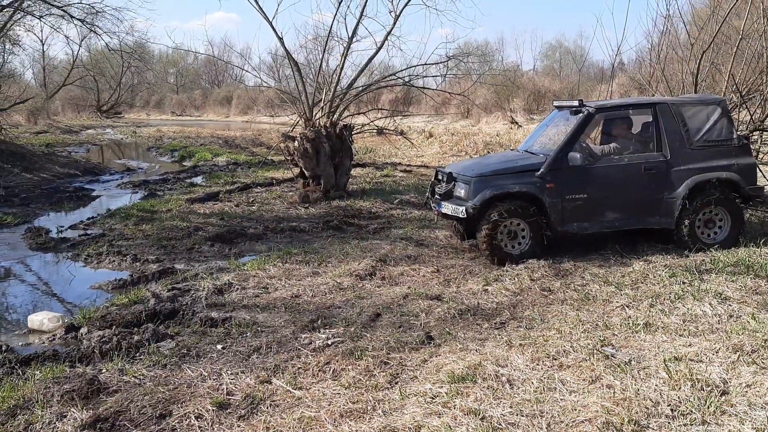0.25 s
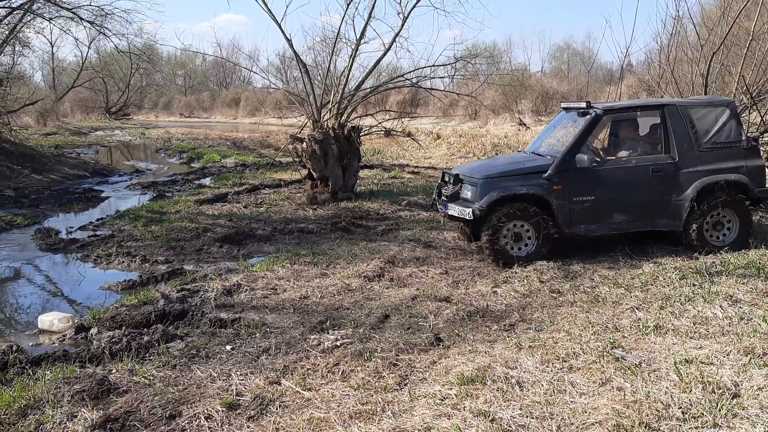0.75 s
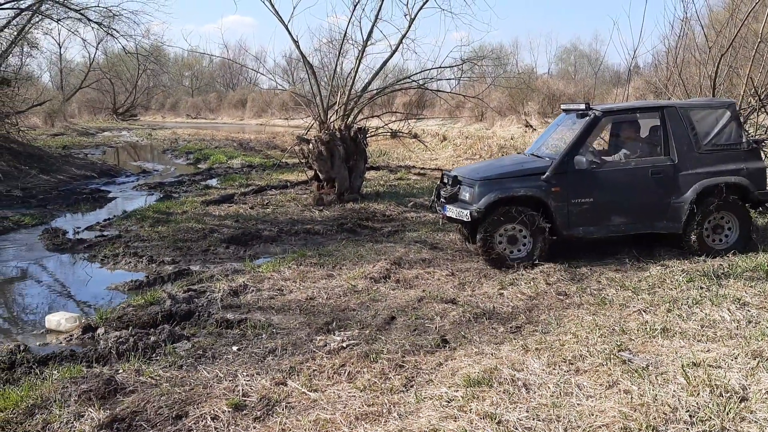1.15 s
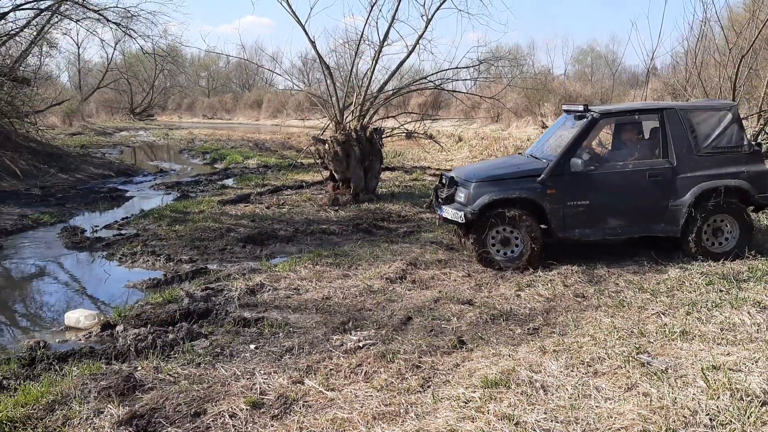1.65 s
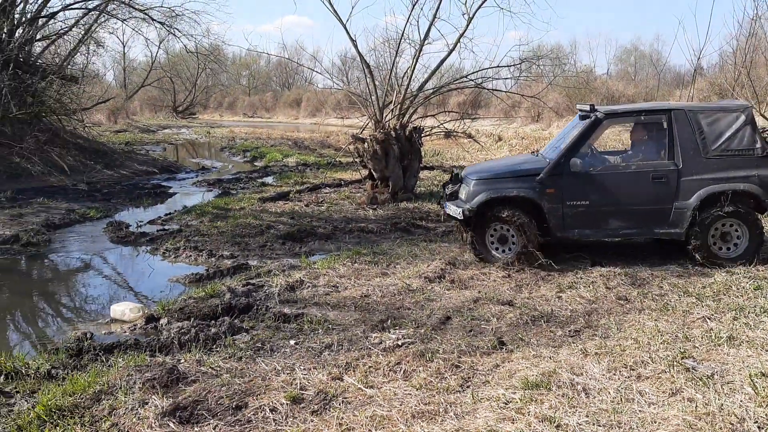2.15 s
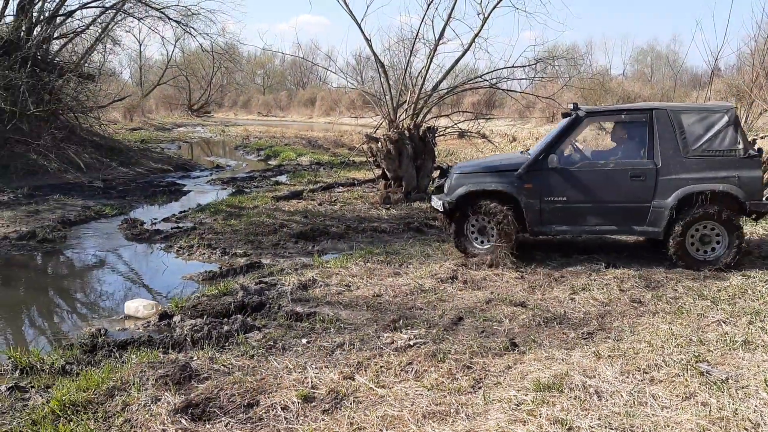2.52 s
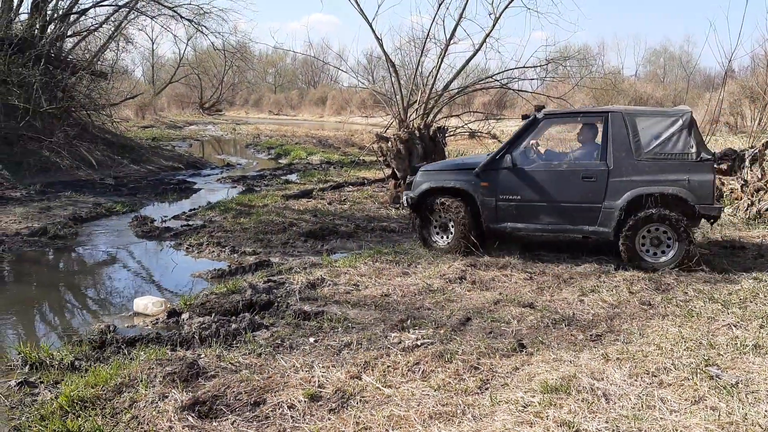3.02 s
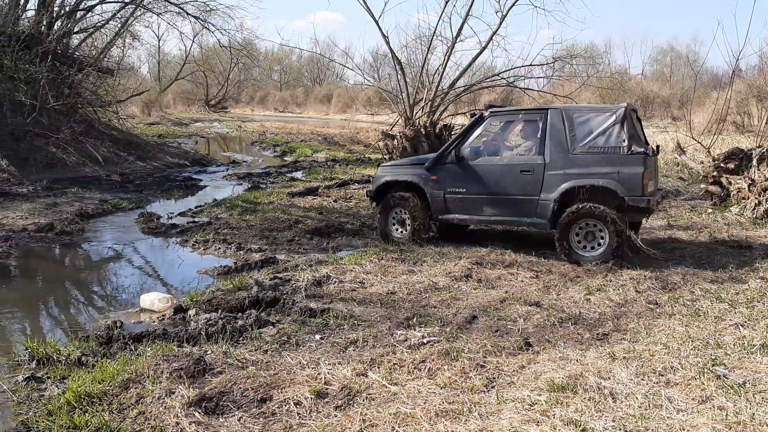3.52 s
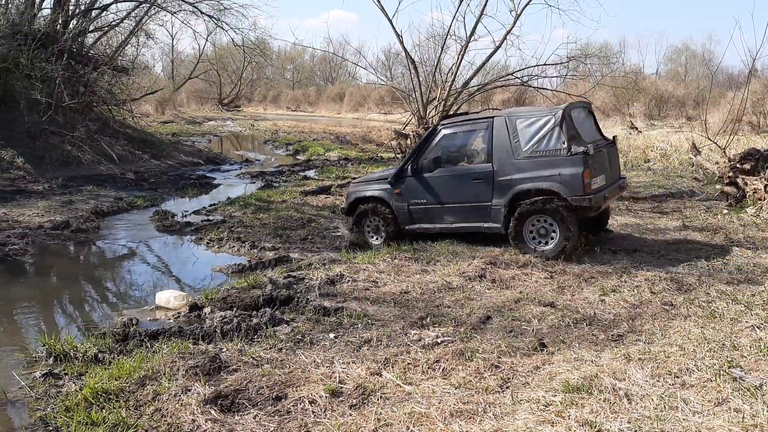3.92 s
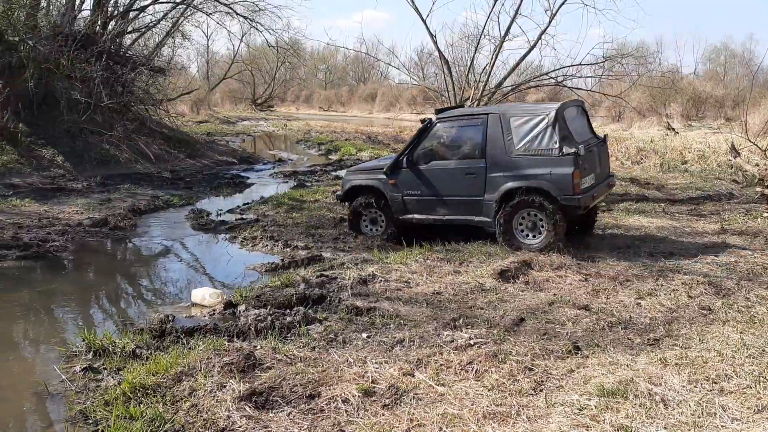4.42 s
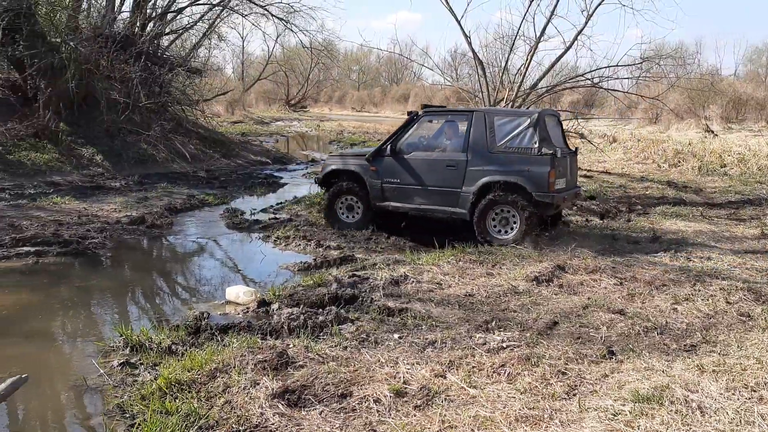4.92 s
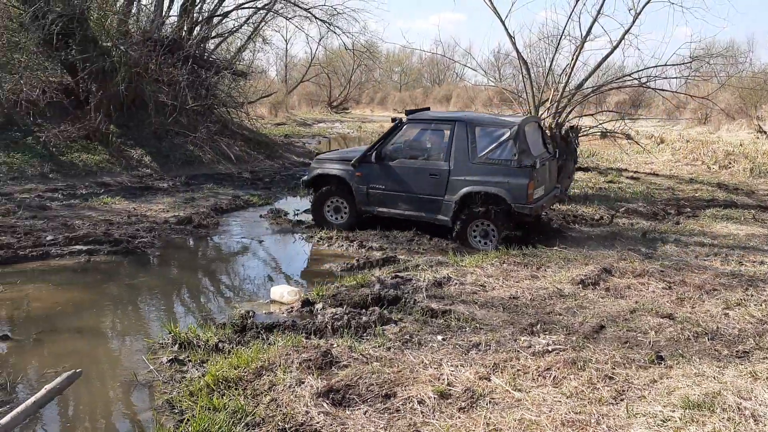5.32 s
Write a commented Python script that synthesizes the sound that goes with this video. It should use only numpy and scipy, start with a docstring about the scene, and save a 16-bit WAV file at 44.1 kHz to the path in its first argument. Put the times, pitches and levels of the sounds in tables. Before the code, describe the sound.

A small off-road car growls across a muddy meadow in short throttle dabs, tyres crunching dry grass, then revs up hard towards a stream.

```python
"""A small bird chirps far off while a small four-wheel-drive crawls over a muddy meadow in dabs of throttle.
Each dab makes pulse orders of the exhaust boom and turbulent gas rasp; engine bay resonances whir and sing.
The tyres crush dry grass in clumps of tiny fractures; stalks snap as short noise bursts throughout.
A tyre slips once in gliding bands of noise, the springs squeak in short tones, and the tail swings round.
Wet earth joins the grass, and at last the engine revs up towards a stream."""
import sys
import numpy as np
from scipy import signal
from scipy.fft import rfft, irfft, next_fast_len
from scipy.io import wavfile
from scipy.ndimage import uniform_filter1d, map_coordinates

SR = 44100
rng = np.random.default_rng(int(sys.argv[2]) if len(sys.argv) > 2 else 0)


def persist_wave(psi):
    """Save psi, clipped to +-1, as 16-bit WAV."""
    counts = np.round(np.clip(psi, -1, 1) * 32767).astype(np.int16)
    wavfile.write(sys.argv[1], SR, np.atleast_2d(counts).T)


N = 245195

# crank speed at its turning points: (time [s], firing rate [1/s])
FIRING_RATE = [(0.0, 37.01), (0.456, 28.9), (0.696, 46.78), (0.781, 46.66), (1.094, 63.61), (1.278, 57.9),
               (1.55, 68.19), (2.015, 45.35), (2.282, 52.1), (2.569, 43.51), (2.786, 54.46), (3.362, 33.83),
               (3.676, 51.11), (3.903, 57.08), (4.305, 60.91), (4.393, 67.71), (4.562, 70.44),
               (4.967, 89.47), (5.28, 113.64), (5.56, 128.53)]
CRAWL_HZ = 60  # reference firing rate
# presses of the throttle: (start [s], hold [s], load [0-1])
THROTTLE_PRESSES = [(0.401, 0.24, 0.76), (.73, 0.33, 0.73), (1.198, 0.29, 0.7), (1.98, 0.27, 0.51),
                    (2.489, 0.25, 0.56), (3.298, .42, 0.71), (3.6, .69, 0.66), (4.2, 1.4, 0.86)]
PRESS_S, RELEASE_S = 0.15, 0.065  # linear build-up; time constant of the decay once the foot lifts

# exhaust from coasting to full load, before the gains that follow speed: (load [0-1], firing order [dB],
# order 1.5 [dB], order 2 [dB], muffler drone [dB], pulse edges [dB], gas rasp [dB])
EXHAUST_BY_LOAD = [(0, -36, -69, -48, -35.5, -58, -66), (.35, -35, -47, -41, -34, -50, -55.5),
                   (.6, -36, -48, -39, -42.5, -45.5, -48.5), (1, -25, -27, -34, -40.5, -38.5, -41)]
HALF_ORDER_DB = 4  # order 0.5 over order 1.5
# order 3 grunts when the engine lugs: (firing rate [1/s], level over order 1.5 [dB])
THIRD_ORDER = [(40, 1.5), (50, -1.5), (58, -22.5)]
# pipe resonances that each order sweeps through: (frequency [Hz], gain [dB])
BOOM_COLOUR = [(25, -43), (37, -20), (46, -13), (60, 1), (75, 10), (95, 7.5), (118, 0), (160, 9.5),
               (185, 9), (205, 6.5), (250, 3.5)]
PIPE_HZ, PIPE_WIDTH_HZ = 84, 26  # the exhaust pipe's lowest resonance
RING_FROM_HZ, RING_STEP_HZ = 330, 130  # above this pitch a growing phase lag smears each edge

# what muffler and tailpipe pass of the pulse edges: (frequency [Hz], gain [dB])
TAILPIPE = [(130, -9.5), (170, -3.5), (205, -2.5), (240, -0.5), (270, -2), (300, -12), (335, -9),
            (390, -29), (440, -9.5), (490, -8), (540, -3.5), (580, -14), (625, -11), (700, -29), (820, -10),
            (930, -37), (1100, -8), (1400, -24)]
# the pulses sharpen with the revs: (firing rate [1/s], gain [dB])
EDGE_GROWTH = [(45, -5.5), (62, -3.5), (70, 1.5), (83, 6.5), (98, 10), (110, 10), (128, 8)]
EDGE_DB_PER_OCTAVE = -7.5  # slope of the orders above the fourth
EDGE_JITTER, EDGE_SCATTER_DB = 0.0099, 2.08  # scale of random timing [firings] and of random level
# half orders against whole ones, by engine speed: (firing rate [1/s], gain [dB])
LIMP_BY_SPEED = [(41, -14), (50, 1)]
# half orders against whole ones, by pitch: (frequency [Hz], gain [dB])
LIMP_BY_PITCH = [(290, 1.5), (400, -14.5)]
STRONG_CYLINDER_DB = 1.5  # accent of the hardest cylinder, before each part's own weight
# firings that bang out harder, as heard in the edges: (time [s], accent [dB])
BANGS = [(0.585, 12.5), (.924, 3.5), (0.996, 5), (3.575, 4.5), (4.642, 2.5), (4.694, 0.5)]
BANG_S = 0.0089  # standard deviation of the bell-shaped accent

# the rasp grows with the revs: (firing rate [1/s], gain [dB])
RASP_GROWTH = [(30, -14), (55, -0.5), (78, 3), (87, 12), (95, 5.5), (107, 8.5), (128, 11.5)]
# spectrum of the gas heard from the car's side: (frequency [Hz], density [dB per Hz])
GAS_SIDE = [(200, 6), (340, -2.5), (480, -8), (590, -4), (690, 6), (800, -8), (1000, -2.5), (1600, -21),
            (5000, -19), (13000, -20.5)]
# spectrum of the gas heard from behind: (frequency [Hz], density [dB per Hz])
GAS_BEHIND = [(200, 14), (340, 0), (450, 8.5), (550, 5), (680, -5.5), (1050, 2), (1600, -32), (5000, -12.5),
              (13000, -26.5)]
BARK_S, BARK_DB = 0.35, 3.5  # gain per unit rise of load over this time
PUFF_SCATTER_DB = 2.8  # no two puffs are alike
TURN_FROM_S, TURN_TO_S = 3.45, 3.76  # the car swings its tail towards the microphone

# muffler chamber, applied twice: (centre [Hz], width [Hz], gain of one pass [dB])
CHAMBER = [(138, 38, -4), (202.9, 38.6, -1.5), (233, 41, -.5)]
MUFFLER_HZ = 256  # steep upper cutoff of the chamber
# the chamber's ring blurs at low revs: (firing rate [1/s], turbulent share [0-1])
BLUR = [(35, .5), (42, .13), (64, .06)]
# the drone swells with the revs, then sinks as the orders pass the muffler: (firing rate [1/s], gain [dB])
DRONE_GROWTH = [(30, -6.5), (45, -1), (60, -0.5), (92, -5.5), (128, -20)]

# engine bay noise spectrum: (frequency [Hz], gain [dB])
BAY_COLOUR = [(100, 2.5), (370, 0.5), (480, 6), (800, -4), (1250, -1), (1600, 3.5), (1820, -6.5), (2200, 0),
              (3200, -8), (5000, -10), (7000, -13), (16000, -24)]
# engine bay resonances: (centre [Hz], width [Hz], gain [dB])
PANELS = [(624, 64, 1.5), (1131, 32, 3.5), (1394, 54, -13), (2040, 42, 7), (2487, 160, 1.5),
          (2930, 58, 2.5), (3800, 84, -19), (4254, 230, -2)]
# panels that sing for a while: (middle [s], length [s], pitch [Hz], width [Hz], level [dB])
SINGING = [(0.253, 1.9, 1424, 49, -61.5), (.95, 1.4, 2174, 79.6, -57), (1.277, 1.9, 657.5, 59.9, -61),
           (1.85, 1.5, 2163, 89.8, -59.5), (2.5, 0.83, 2197, 148.8, -60.5), (2.68, 1.4, 1370, 110.3, -59),
           (2.767, 0.98, 1104, 50.24, -58), (2.926, 0.53, 2123, 109.5, -56.5),
           (3.47, 0.23, 1414, 109.9, -58), (4.0, 1.6, 1115, 50.05, -64)]
BAY_DB, BAY_LOAD_DB = -50.5, 1  # reference level coasting at the crawl, and gain at load 1
BAY_DB_PER_OCTAVE = 4  # growth with crank speed
WAVER, FLUTTER_DB = 0.0082, 2.3  # random share of a singing panel's pitch, and random level

# how hard the tyres crush the ground: (time [s], tread level [dB])
TREAD = [(0.0, -61.5), (0.32, -78), (0.56, -59), (0.71, -62.5), (1.27, -55), (1.36, -54), (1.76, -57),
         (2.77, -58), (3.02, -60), (3.3, -57.5), (3.7, -53.5), (4.92, -48.5), (5.05, -48), (5.22, -43.5),
         (5.34, -43), (5.56, -41)]
# wet earth spectrum: (frequency [Hz], gain [dB])
EARTH_COLOUR = [(300, 1), (600, 2), (1100, -5.5), (1600, 3), (1850, -4.5), (2200, -3), (3800, -3),
                (5500, -27), (9000, -7.5), (16000, -51)]
# dry grass spectrum: (frequency [Hz], gain [dB])
GRASS_COLOUR = [(1500, -1.5), (3500, 1), (5000, -2.5), (6500, -5.5), (9000, -5), (11300, 1.5),
                (13500, -2.5), (15800, -12)]
GRASS_DB, EARTH_DB = 2.5, 6.5  # over the tread level, earth when fully wet
MUD_FROM_S, MUD_FULL_S = 3.15, 6  # straight ramp of wetness, still rising at the end
STALKS_PER_S, STALK_T60_S, STALK_DB = 14, 0.015, -10.5  # mean rate, decay, level over the tread

# twigs and clods: (time [s], level [dB], centre [Hz], width [octaves], 60 dB decay [s])
SNAPS = [(0.2103, -40, 3280, 0.44, 0.017), (0.306, -37, 9000, 1.1, 0.008), (.527, -48, 12500, .4, .025),
         (.574, -51, 12500, .4, .025), (.621, -47, 12500, .4, .025), (1.846, -42, 10300, 0.35, 0.033),
         (2.0999, -28, 9700, 0.55, 0.01), (2.79, -48.5, 3000, 0.63, 0.73), (3.596, -38.5, 985, 0.31, 0.056),
         (3.615, -52, 950, .45, 0.046), (3.75, -33, 12900, 0.22, 0.0084), (3.829, -38, 1060, 0.41, 0.14),
         (3.865, -38, 750, 0.33, 0.023), (3.905, -39, 10000, 0.76, 0.033), (4.6554, -35, 9800, 0.52, 0.019),
         (4.69, -43, 905, 1, 0.017), (4.842, -37, 1700, 1.06, 0.23), (4.918, -32.5, 2000, 1.4, 0.13),
         (4.975, -32.5, 1030, 0.17, 0.17), (5.003, -33.5, 2180, 1.5, 0.15), (5.309, -32, 3020, 2.36, 0.036),
         (5.406, -24.5, 8100, 1.7, 0.031), (5.479, -28, 11100, 1.09, 0.035)]

# scrape of the slipping tyre: (frequency [Hz], density [dB per Hz])
SKID_COLOUR = [(700, -17), (1200, -1), (2900, -1.5), (3400, -20), (6300, -25), (7600, -8), (9000, -15),
               (14000, -33)]
# resonances of the slip: (start [s], length [s], start pitch [Hz], end pitch [Hz], width [Hz], level [dB])
SKID_GLIDES = [(1.173, 0.06, 6900, 8100, 1100, -53), (1.184, 0.07, 1142, 1515, 448, -48),
               (1.199, 0.111, 2160, 1940, 499, -48.5), (1.217, 0.051, 2720, 2880, 200, -46.5)]
SKID_S, SKID_LENGTH_S, SKID_DB = 1.174, 0.088, -44  # start, time until release, level
SKID_ATTACK_S, SKID_RELEASE_S = 0.026, 0.086  # breaks loose quickly, grips again gradually

# springs and bodywork over a bump: (start [s], length [s], mean pitch [Hz], mean level [dB])
SQUEAKS = [(2.778, 0.11, 4240, -61), (2.795, .03, 920, -56), (2.805, .026, 3440, -54),
           (2.823, 0.03, 2940, -49), (2.833, .03, 3530, -50), (3.144, 0.028, 2430, -48),
           (3.176, 0.044, 2490, -50), (3.195, 0.032, 1450, -50)]
# bird notes: (start [s], length [s], start pitch [Hz], end pitch [Hz], peak level [dB])
CHIRPS = [(0.023, 0.056, 5850, 5900, -64), (0.063, 0.061, 4020, 3850, -59), (0.345, .03, 3730, 4020, -65),
          (0.38, 0.076, 4270, 4240, -66), (0.488, .03, 3880, 4000, -62)]
# open air spectrum: (frequency [Hz], gain [dB])
AIR_COLOUR = [(15, -5), (35, -9), (100, 1.5), (330, -11.5), (1000, -118), (5000, -39.5), (16000, -31)]

# level difference of the car between the ports: (frequency [Hz], left over right [dB])
PORT_DIFFERENCE = [(60, 1.8), (250, 0.1), (500, 2.5), (1100, -0.5), (1450, 2), (2200, -1), (4000, -1),
                   (8000, 2), (11500, 16), (16000, 12)]
# likeness of the two channels: (frequency [Hz], correlation [-1 to 1])
CORRELATION = [(100, 0.96), (500, 1), (1000, 0.96), (2000, 0.36), (4000, 0.23), (10000, 0.18)]
TOP_HZ = 15850  # upper band limit


def amp(db):
    """Decibels to gain."""
    return 10 ** (np.asarray(db) / 20)


def unit(x):
    """Scale to rms 1."""
    return x / np.sqrt(np.mean(x ** 2) + 1e-20)


def clock():
    """Seconds at each sample."""
    return np.arange(N) / SR


def along(points, hz):
    """Interpolate (rate, value) points on a logarithmic axis."""
    f, v = np.transpose(points)
    return np.interp(np.log(hz + 1), np.log(f + 1), v)


def curves(rows):
    """One value per sample for each column after the time."""
    s, *cols = np.transpose(rows)
    return [np.interp(clock(), s, c) for c in cols]


def wobble(rate):
    """Smooth random curve through independent knots, rate of them a second."""
    knots = rng.standard_normal(int(N * rate / SR) + 4)
    return map_coordinates(knots, [clock() * rate], order=2)


def swell(start, length):
    """Half-sine rise and fall."""
    return np.sin(np.pi * np.clip((clock() - start) / length, 0, 1))


def noise():
    """Two unrelated white noises."""
    return rng.standard_normal((2, N))


def crackle(rate, spread_db):
    """Poisson-like fractures, rate a second, with exponentially spread sizes in dB."""
    size = amp(spread_db * np.minimum(rng.exponential(size=N), 2.8))
    return unit((rng.random(N) < rate / SR) * size * noise())


def filtered(x, response):
    """Linear filtering: the spectrum of x times a response of frequency."""
    size = next_fast_len(N + SR // 2)
    return irfft(rfft(x, size) * response(np.fft.rfftfreq(size, 1 / SR)), size)[..., :N]


def resonances(modes, hz):
    """Modal sum: causal second-order responses of (centre, width, gain) modes."""
    return sum(amp(db) * 1j * hz * w / (c * c - hz * hz + 1j * hz * w) for c, w, db in modes)


def steady(x):
    """Hold the slow level near rms 1, keeping the single beats."""
    power = uniform_filter1d(uniform_filter1d(x ** 2, size=SR // 14), size=SR // 14)
    return x / np.sqrt(np.abs(power) + 1e-12)


def spread(pair, colour):
    """Interchannel correlation: mixing two unrelated signals gives stereo alike in the bass, diffuse above."""
    def response(hz):
        turn = np.arccos(np.clip(along(CORRELATION, hz), -1, 1)) / 2
        return colour(hz) * np.array([np.cos(turn), np.sin(turn)])
    mid, side = filtered(pair, response)
    return unit(np.array([mid + side, mid - side]))


def coloured(pair, points):
    """Spectral shaping of two noises by a (frequency, dB) table, as stereo of rms 1."""
    return spread(pair, lambda hz: amp(along(points, hz)))


def ringing(pitch_hz, width_hz):
    """Amplitude modulation by slow noise: a narrow stereo band around a moving pitch."""
    angle = 2 * np.pi * np.cumsum(pitch_hz) / SR
    pair = [wobble(width_hz) * np.cos(angle) + wobble(width_hz) * np.sin(angle) for _ in range(2)]
    return spread(np.array(pair), np.ones_like)


def throttle():
    """Load as a first-order release: each press builds up, holds and dies away; the largest counts."""
    t = clock()
    presses = []
    for s, held, load in THROTTLE_PRESSES:
        build_up = np.clip((t - s) / PRESS_S, 0, 1)
        release = np.exp(-np.maximum(t - s - held, 0) / RELEASE_S)
        presses.append(load * build_up * release)
    return np.max(presses, axis=0)


def under_load(load):
    """Levels of the exhaust's parts at this load, in dB."""
    steps, *cols = np.transpose(EXHAUST_BY_LOAD)
    return [np.interp(load, steps, c) for c in cols]


def strong_cylinder(turns):
    """Cylinder inequality: an accent in dB that comes round once in four firings."""
    return STRONG_CYLINDER_DB * np.cos(np.pi / 2 * (turns - 2.2))


def bangs():
    """Irregular combustion: bell-shaped accents in dB at the hardest firings."""
    return sum(db * np.exp(-.5 * ((clock() - s) / BANG_S) ** 2) for s, db in BANGS)


def engine_order(k, speed, turns):
    """Order tone: a sinusoid at k times the firing rate, its phase lagged by the pipe."""
    hz = k * speed
    ring_lag = (np.maximum(hz - RING_FROM_HZ, 0) / RING_STEP_HZ) ** 2
    pipe_phase = np.arctan2(hz * PIPE_WIDTH_HZ, hz ** 2 - PIPE_HZ ** 2)
    return np.sqrt(2) * np.cos(2 * np.pi * k * turns + pipe_phase - ring_lag)


def exhaust(speed, turns, load):
    """Periodic gas flow as a Fourier series: low orders boom, high ones sharpen the pulse edges under load."""
    first_db, limp_db, second_db, _, edge_db, _ = under_load(load)
    third_db = limp_db + along(THIRD_ORDER, speed)
    orders = [(1 / 2, limp_db + HALF_ORDER_DB), (1, first_db), (3 / 2, limp_db), (2, second_db), (3, third_db)]
    boom = 0
    for k, db in orders:
        boom = boom + amp(db + along(BOOM_COLOUR, k * speed)) * engine_order(k, speed, turns)

    ragged_turns = turns + EDGE_JITTER * wobble(70)
    half_db = along(LIMP_BY_SPEED, speed)
    edges = 0
    for k in np.arange(5, 25) / 2:
        db = along(TAILPIPE, k * speed) + EDGE_DB_PER_OCTAVE * max(np.log2(k) - 2, 0)
        if k % 1:  # half orders make successive firings unequal
            db = db + half_db + along(LIMP_BY_PITCH, k * speed)
        edges = edges + amp(db) * engine_order(k, speed, ragged_turns)
    accent_db = 1.17 * strong_cylinder(turns) + bangs() + EDGE_SCATTER_DB * wobble(60)
    edge_gain = amp(edge_db + along(EDGE_GROWTH, speed) + accent_db)
    return boom * amp(0.46 * wobble(45)) + edges * edge_gain


def firings(turns, limp, first, count):
    """Band-limited pulse train; weak half orders (share limp) make every second pulse differ."""
    return sum(np.cos(np.pi * k * turns) * (limp if k % 2 else 1) for k in range(first, first + count))


def muffler(speed, turns, load):
    """Cavity resonance: the chamber drones on between the firings, blurred by turbulence at low revs."""
    drone_db = under_load(load)[3]

    def cutoff(hz):
        return 1 / (1 + (hz / MUFFLER_HZ) ** 20)

    def chamber(hz):
        return resonances(CHAMBER, hz) ** 2 * cutoff(hz)

    pulses = firings(turns, .2, first=5, count=16) * amp(.7 * wobble(40))
    beats = steady(filtered(pulses, chamber))
    # keeping only the phase of the swirl gives even strength with a wandering pitch
    swirl = signal.hilbert(filtered(rng.standard_normal(N), chamber))
    pulsed_swirl = np.cos(np.angle(swirl)) * amp(2 * np.cos(2 * np.pi * turns))
    gas = steady(filtered(pulsed_swirl, cutoff))
    blur = np.clip(along(BLUR, speed), 0, 1)
    drone = np.sqrt(1 - blur) * beats + np.sqrt(blur) * gas
    return amp(drone_db + along(DRONE_GROWTH, speed)) * drone


def rasp(speed, turns, load):
    """Pulsed jet noise: a turbulent puff at each firing, recoloured as the car turns."""
    earlier_load = np.interp(clock() - BARK_S, clock(), load)
    opening = np.maximum(load - earlier_load, 0)
    level_db = under_load(load)[-1] + along(RASP_GROWTH, speed) + BARK_DB * opening + 0.32 * bangs()
    angle = 2 * np.pi * (turns - .1)
    # the half-rate term makes every second firing blow harder
    beat_db = 2 * np.cos(angle) + 4 * np.cos(angle / 2) + .7 * strong_cylinder(turns)
    apart = np.interp(speed, [58, 85], [1, .6])  # the puffs run together at high revs
    puff = amp(apart * beat_db + PUFF_SCATTER_DB * wobble(70))
    side = coloured(noise() * puff, GAS_SIDE)
    behind = coloured(noise() * puff, GAS_BEHIND)
    turned = np.interp(clock(), [TURN_FROM_S, TURN_TO_S], [0, 1])
    return amp(level_db) * (np.sqrt(1 - turned) * side + np.sqrt(turned) * behind)


def engine_bay(speed, turns, load):
    """Forced vibration: valve gear and fan shake the panels, some of which sing for a while."""
    octaves_above_crawl = np.log2(speed / CRAWL_HZ)
    level_db = BAY_DB + BAY_LOAD_DB * load + BAY_DB_PER_OCTAVE * octaves_above_crawl
    taps = amp(1.2 * np.cos(4 * np.pi * turns) + .7 * wobble(40))  # two a firing

    def panel_response(hz):
        return np.sqrt(sum(abs(resonances([mode], hz)) ** 2 for mode in PANELS))

    whir = coloured(noise() * taps, BAY_COLOUR)
    ring = spread(noise() * taps, panel_response)
    out = amp(level_db) * (0.84 * whir + 0.61 * ring)
    for middle, length, hz, width, db in SINGING:
        pitch = hz * (1 + WAVER * wobble(7))
        whine = unit(amp(FLUTTER_DB * wobble(14)) * ringing(pitch, width))
        out = out + amp(db) * swell(middle - length / 2, length) * whine
    return out


def tyres():
    """Granular friction: the tread churns wet earth and crushes dry grass in clumps of tiny fractures."""
    tread_db, = curves(TREAD)
    wet = np.interp(clock(), [MUD_FROM_S, MUD_FULL_S], [0, 1])
    clumps = amp(1.54 * wobble(25) + 0.1 * wobble(70))
    earth = coloured(noise() + 0.13 * crackle(rate=730, spread_db=11.0), EARTH_COLOUR)
    grass = coloured(noise() + .55 * crackle(rate=600, spread_db=4), GRASS_COLOUR)
    return clumps * amp(tread_db) * (wet * amp(EARTH_DB) * earth + amp(GRASS_DB) * grass)


def stalks():
    """Impulsive fracture: sparse dry ticks start sharply and decay exponentially."""
    tread_db, = curves(TREAD)
    breaks = (rng.random(N) < STALKS_PER_S / SR) * rng.uniform(0.85, 1, N)
    fading = signal.lfilter([1], [1, -amp(-60 / (STALK_T60_S * SR))], breaks)
    ticks = spread(noise() * fading, lambda hz: amp(along(GRASS_COLOUR, hz)) * hz / (hz + 6000))
    return amp(tread_db + STALK_DB) * ticks


def skid():
    """Sliding friction: a tyre slips and scrapes over the stalks, with gliding resonances."""
    scrape = coloured(noise() + .5 * crackle(rate=900, spread_db=5), SKID_COLOUR)
    t = clock() - SKID_S
    attack = np.clip(t / SKID_ATTACK_S, 0, 1)
    release = np.exp(-np.maximum(t - SKID_LENGTH_S, 0) / SKID_RELEASE_S)
    out = amp(SKID_DB) * attack * release * scrape
    for s, length, start_hz, end_hz, width, db in SKID_GLIDES:
        pitch = np.interp(clock(), [s, s + length], [start_hz, end_hz])
        out = out + amp(db) * swell(s, length) * ringing(pitch, width)
    return out


def squeaks():
    """Frequency and amplitude modulation: short unsteady tones as the suspension flexes."""
    out = np.zeros(N)
    for s, length, hz, db in SQUEAKS:
        pitch = hz * (1 + 0.0053 * wobble(100))
        out += amp(db + 3.1 * wobble(60)) * swell(s, length) * np.sin(2 * np.pi * np.cumsum(pitch) / SR)
    return out


def snaps():
    """Impact excitation: twigs snap and clods knock the chassis, each a decaying burst in its own band."""
    out = np.zeros((2, N + SR))
    t = np.arange(SR // 8) / SR  # each burst is cut off after 1/8 s
    octave = np.log2(np.fft.rfftfreq(len(t), 1 / SR) + 1)
    for s, db, hz, width, t60 in SNAPS:
        band = np.exp(-.5 * ((octave - np.log2(hz)) / width) ** 2)
        burst = unit(irfft(rfft(rng.standard_normal((2, len(t)))) * band, len(t)))
        # the burst starts 2.5 dB below the table's level
        out[:, round(s * SR):][:, :len(t)] += amp(db - 2.5 - 60 * t / t60) * burst
    return out[:, :N]


def ports(car, lag=0.00013):
    """Interaural-style cues: the left microphone port hears the car a little earlier and brighter."""
    def response(hz):
        gains = amp(np.outer([.5, -.5], along(PORT_DIFFERENCE, hz)))
        balanced = gains / np.sqrt(np.mean(gains ** 2, axis=0))
        return balanced * np.exp(1j * np.pi * lag * np.outer([1, -1], hz))  # lag [s] between the ports
    return filtered(car, response)


def bird():
    """Pure tones with gliding frequency: thin whistles from the thicket."""
    song = np.zeros(N)
    for s, length, start_hz, end_hz, db in CHIRPS:
        glide = np.interp(clock(), [s, s + length], [start_hz, end_hz])
        pitch = glide * (1 + 0.0117 * wobble(89.3))
        song += amp(db) * swell(s, length) * np.sin(2 * np.pi * np.cumsum(pitch) / SR)
    return song


def open_air():
    """Stationary broadband noise: the steady background of the meadow."""
    return amp(-49.5) * coloured(noise(), AIR_COLOUR)


def scene():
    """Superposition of the car, its tyres, the bird and the open meadow."""
    speed, = curves(FIRING_RATE)
    turns = np.cumsum(speed) / SR - 1.1  # phase counted in firings
    load = throttle()
    engine = sum(part(speed, turns, load) for part in (exhaust, muffler, rasp, engine_bay))
    ground = tyres() + stalks() + skid() + squeaks() + snaps()
    return ports(engine + ground) + bird() + open_air()


def record(dry):
    """Band limitation: nothing passes at or above the upper limit."""
    return filtered(dry, lambda hz: hz < TOP_HZ)


dry = scene()
out = record(dry)
persist_wave(out)
```